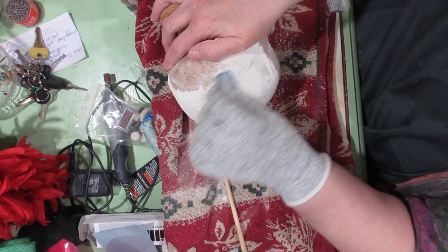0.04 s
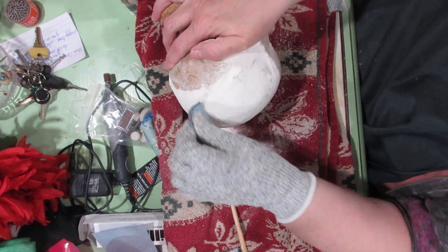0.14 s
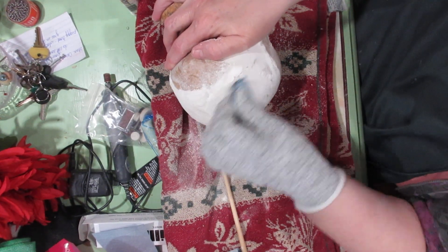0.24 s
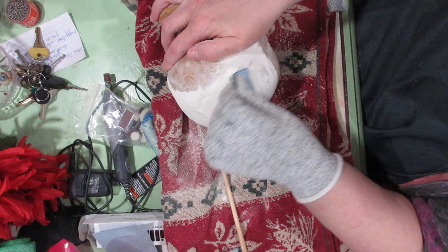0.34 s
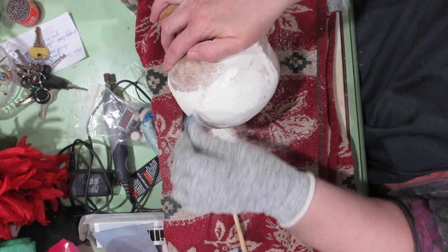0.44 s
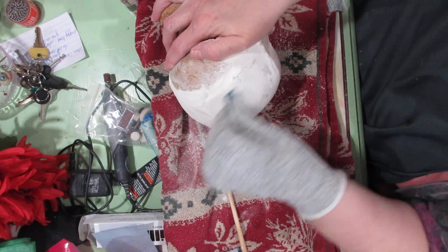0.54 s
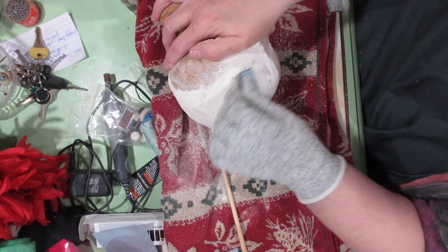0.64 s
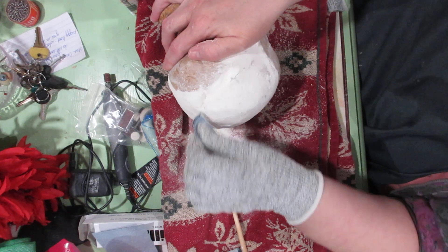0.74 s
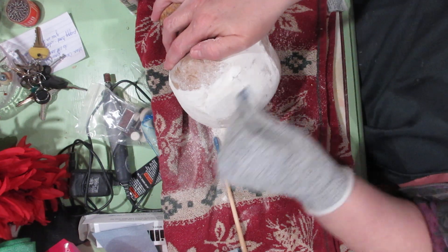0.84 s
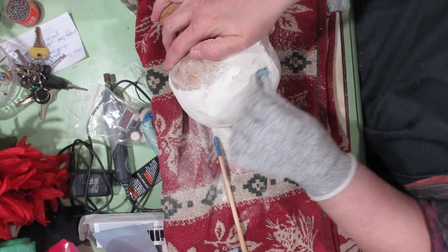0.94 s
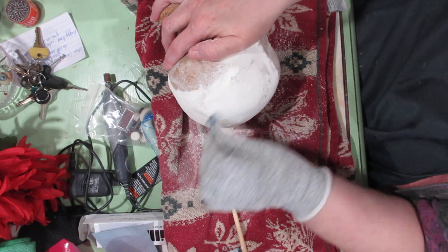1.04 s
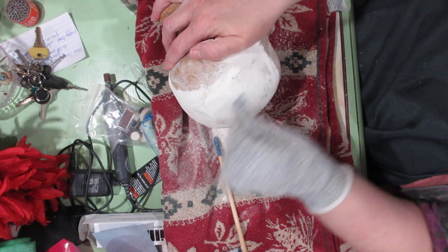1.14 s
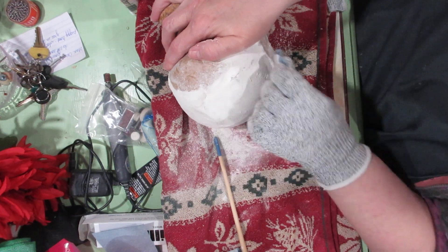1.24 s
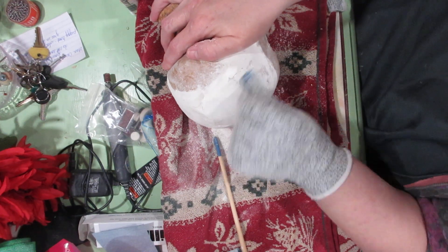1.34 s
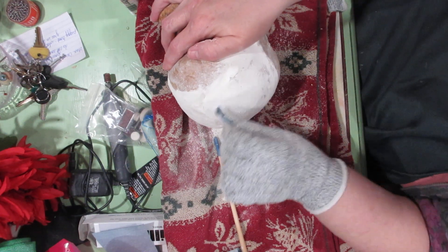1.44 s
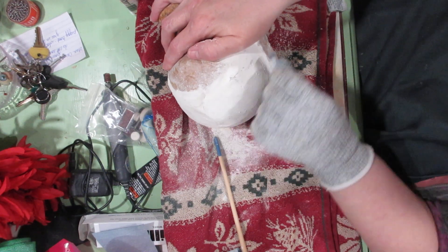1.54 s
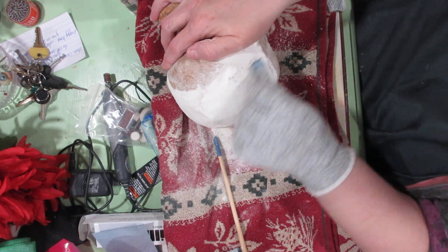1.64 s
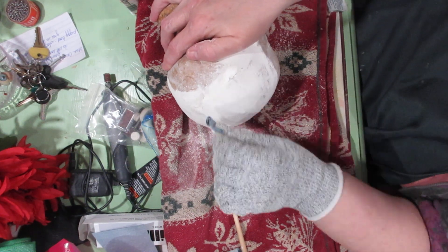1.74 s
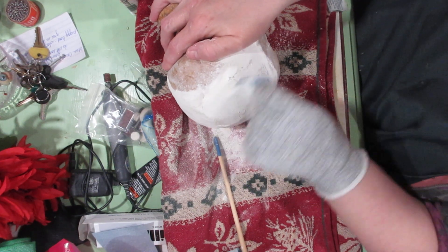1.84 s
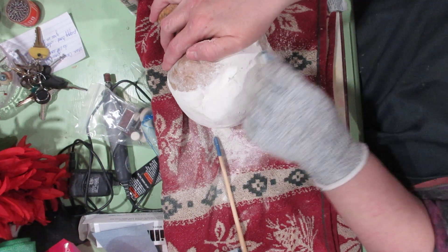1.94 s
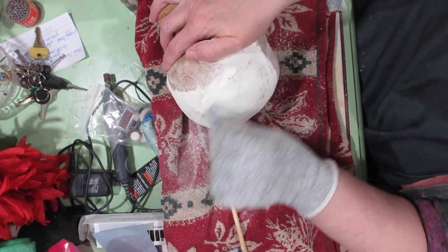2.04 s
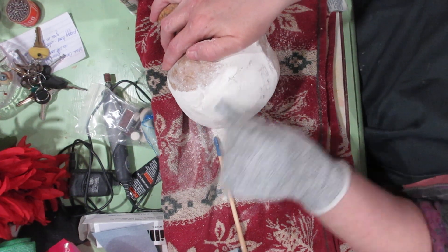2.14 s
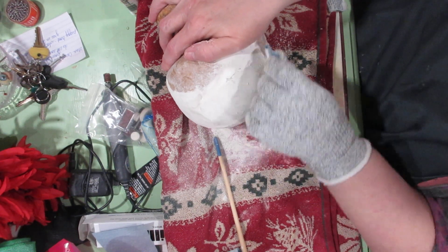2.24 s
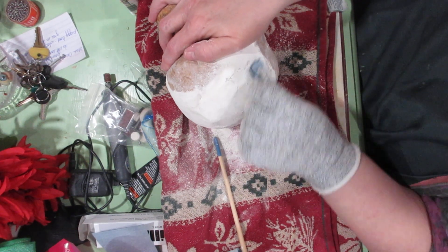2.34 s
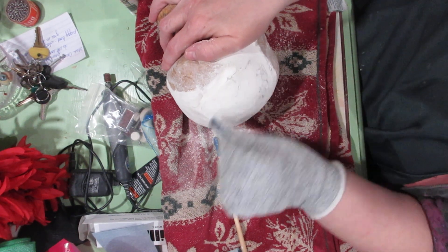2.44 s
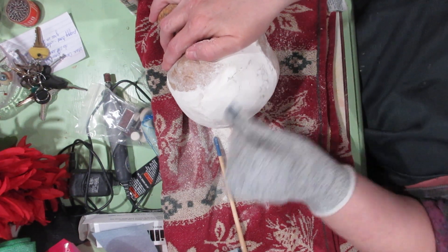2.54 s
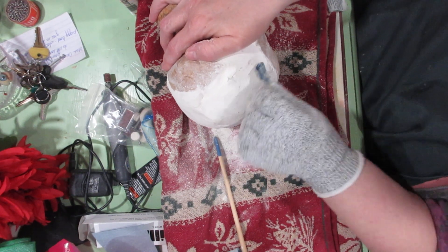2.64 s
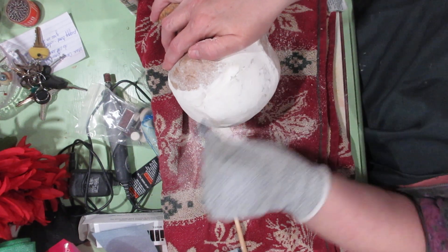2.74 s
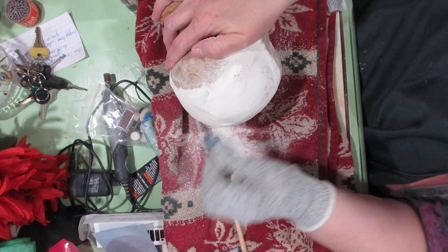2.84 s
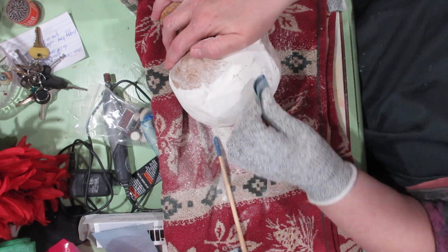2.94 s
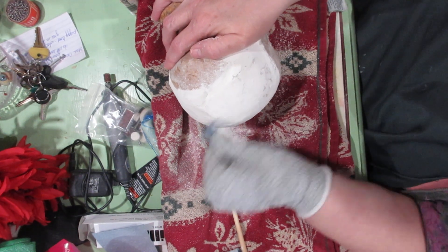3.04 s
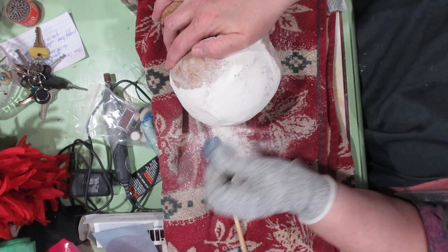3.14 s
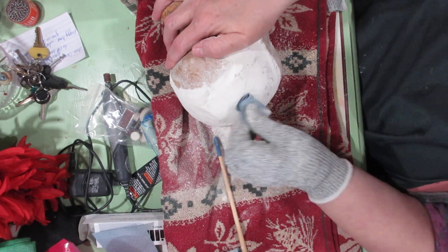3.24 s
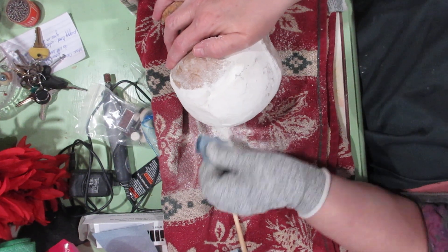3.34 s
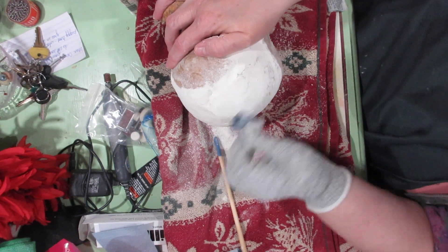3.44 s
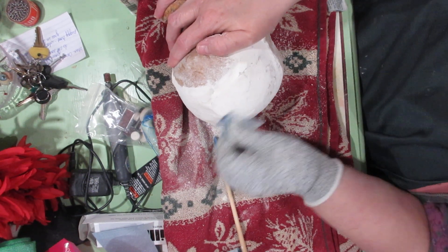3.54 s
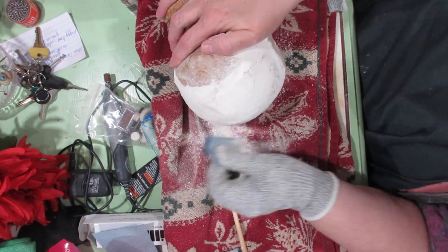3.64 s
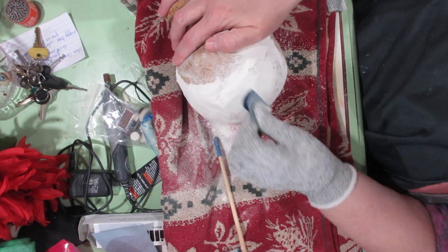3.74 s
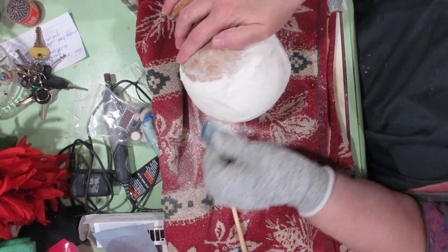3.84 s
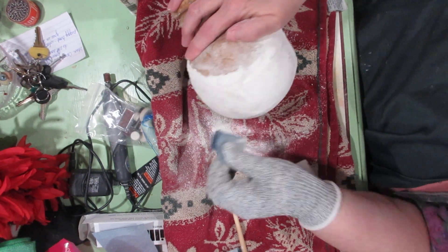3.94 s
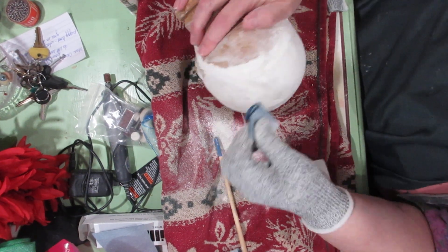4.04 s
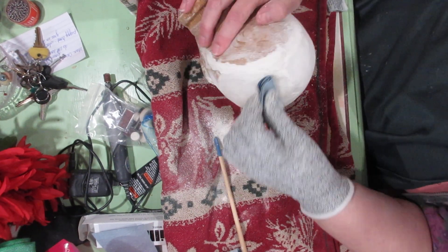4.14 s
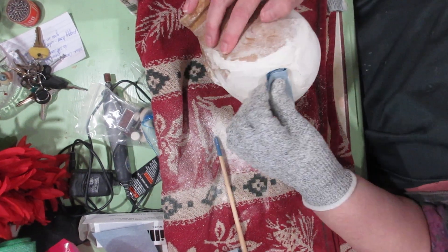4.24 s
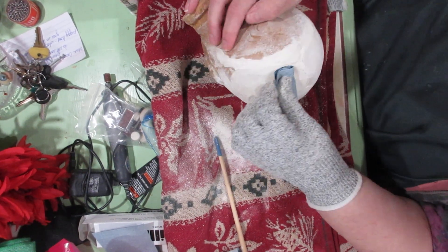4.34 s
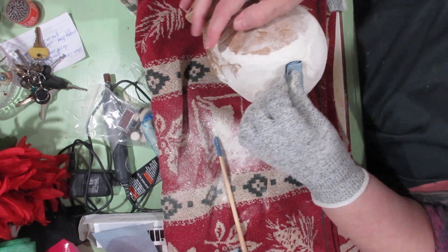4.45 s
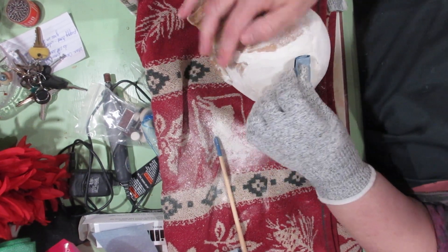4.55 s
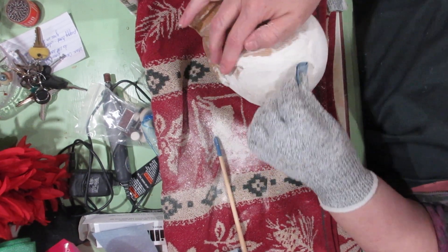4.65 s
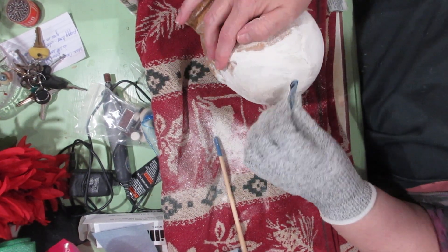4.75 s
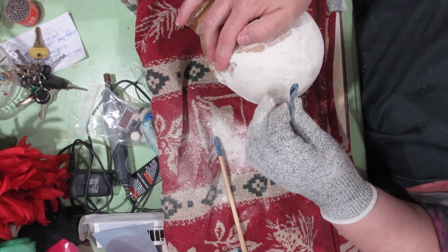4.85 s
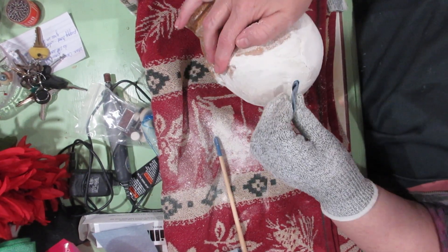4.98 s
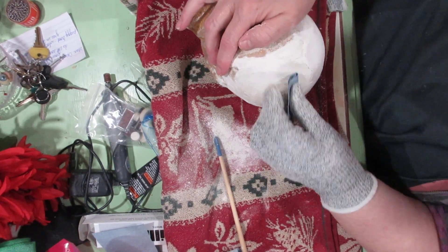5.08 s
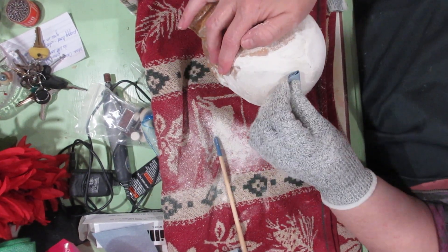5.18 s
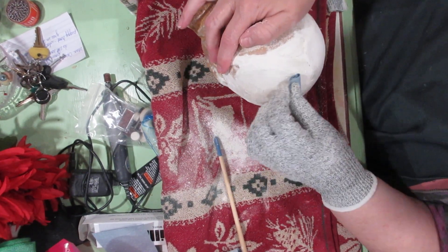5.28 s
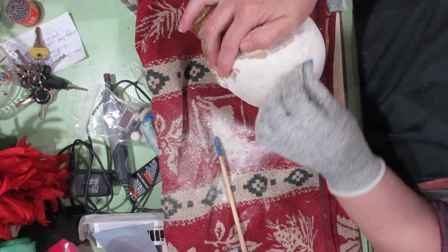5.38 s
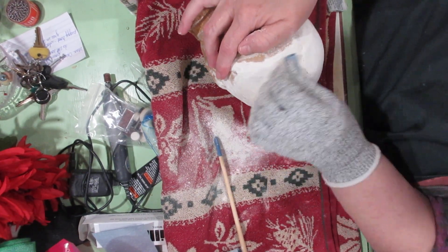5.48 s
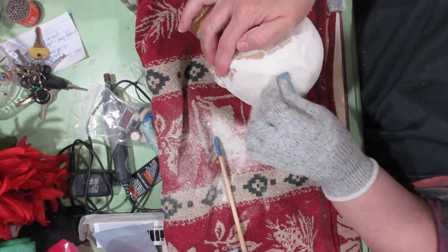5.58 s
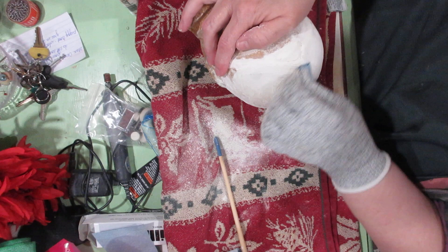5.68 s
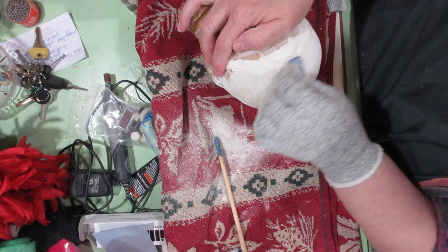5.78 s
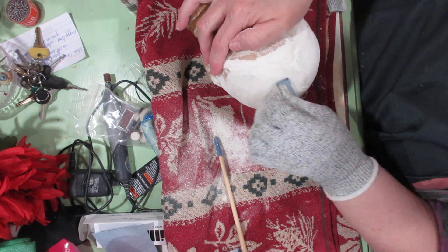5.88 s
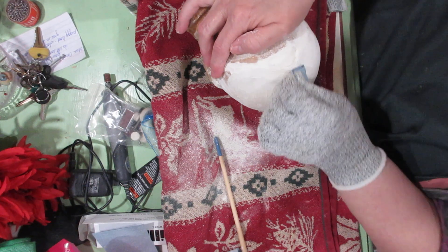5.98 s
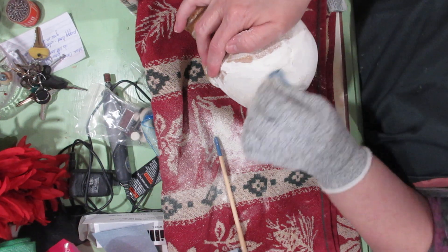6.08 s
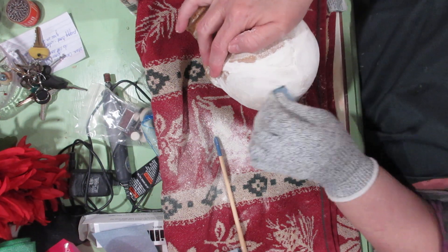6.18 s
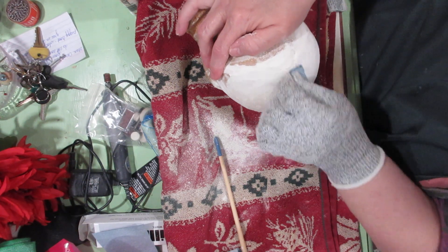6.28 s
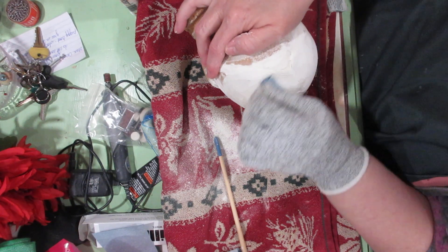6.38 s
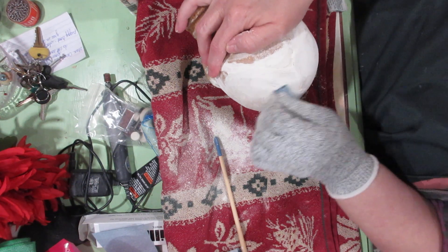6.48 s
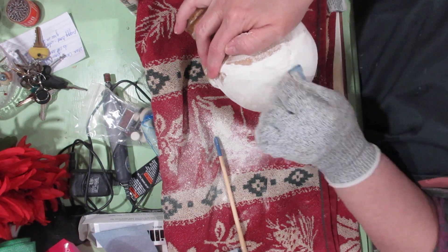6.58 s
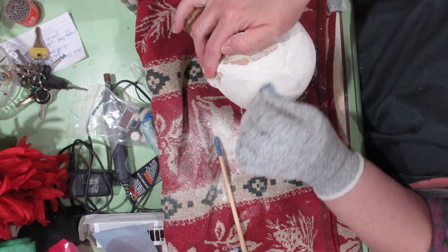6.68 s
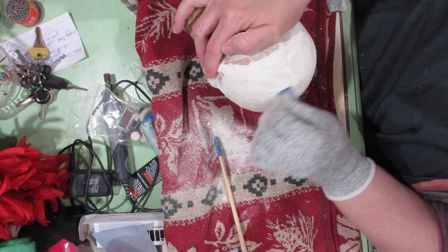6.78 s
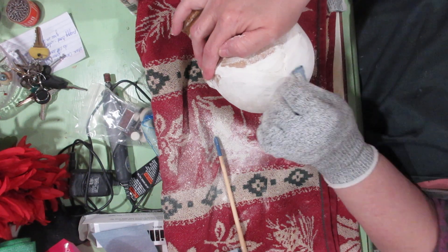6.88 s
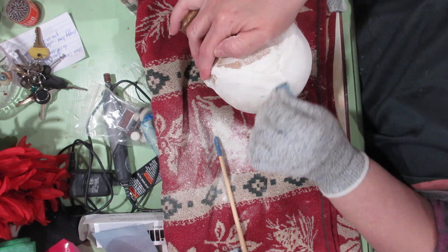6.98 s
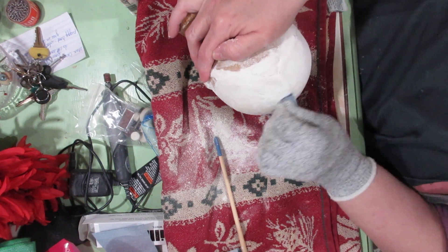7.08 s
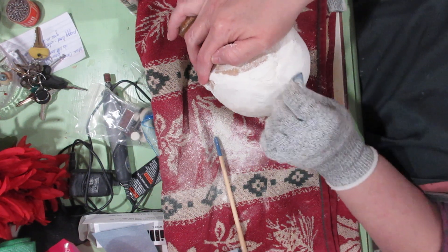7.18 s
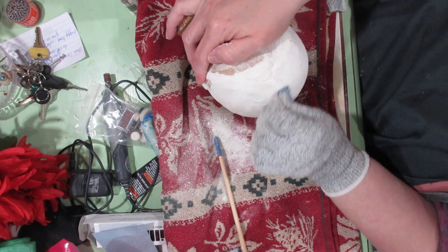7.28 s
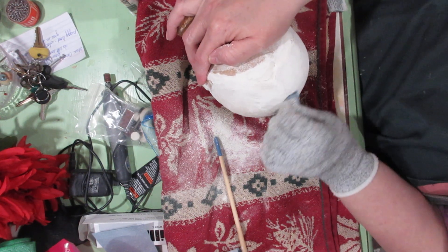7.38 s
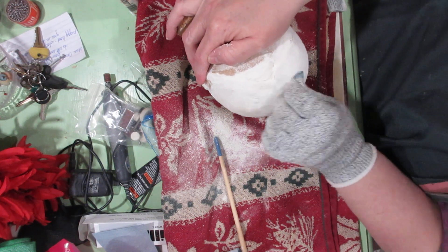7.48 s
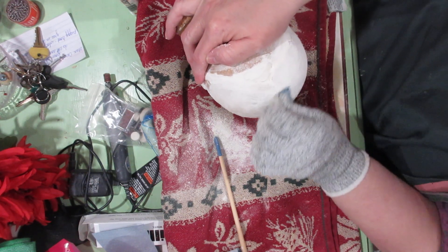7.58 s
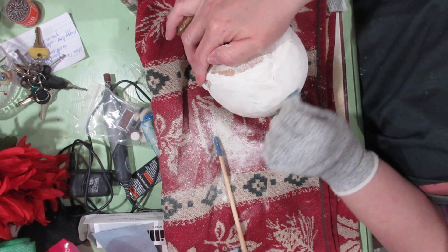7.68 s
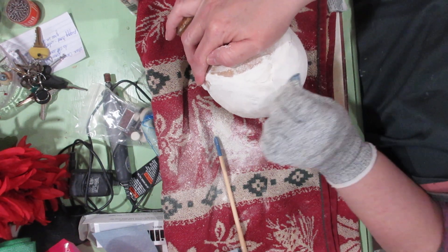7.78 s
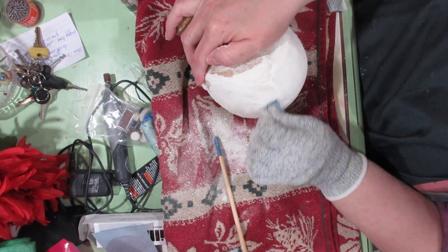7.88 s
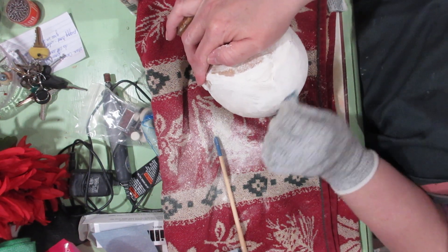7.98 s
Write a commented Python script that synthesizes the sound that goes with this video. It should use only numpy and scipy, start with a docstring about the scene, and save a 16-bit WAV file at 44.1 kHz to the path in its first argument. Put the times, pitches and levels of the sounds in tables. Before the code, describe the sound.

Sandpaper scrapes a hollow plaster-coated ball in short separate gritty swipes, pauses with a soft thump, then rubs in fast steady back-and-forth strokes.

```python
"""A gloved hand rubs a scrap of sandpaper over a hollow plaster-coated ball held on a cloth-covered bench.
Swipes come first, some in two joined movements, then an unbroken back-and-forth. Random grit clicks,
filtered in several ways, make the scrape, dust hiss, paper rasp, shell ring and dull push. Short sprays of
grit with struck-shell tones mark the paper touching down or catching. Glove and cloth rustle, and the ball
lands once with a soft thump. Behind are a small room's reflections, its air noise and a low wavering hum."""
import sys
import numpy as np
from scipy import signal
from scipy.fft import rfft, irfft
from scipy.io import wavfile
from scipy.ndimage import uniform_filter1d

SR = 44100
rng = np.random.default_rng(int(sys.argv[2]) if len(sys.argv) > 2 else 0)


def inscribe(sig):
    """Save sig as 16-bit PCM at rate SR to the path in sys.argv[1].

    A 1-D sig is mono; a 2-D sig holds one channel per row.
    Samples are clipped to [-1, 1] before scaling.
    """
    pcm = np.round(np.clip(np.atleast_2d(sig).T, -1, 1) * 32767)
    wavfile.write(sys.argv[1], SR, pcm.astype(np.int16))


N = 353682
TIME = np.arange(N) / SR  # seconds

# spectrum of grit scraping the ball: f/Hz, level per Hz/dB
SCRAPE = [(1290, -67), (2200, -4), (2950, 1.5), (3620, 0.5), (4550, -1.5), (4980, -3), (5320, -2.5),
          (11400, -8), (14400, -14), (15500, -20.5)]
# resonances of the rubbed shell: f/Hz, basic width/Hz (each use widens or narrows it), level/dB
SHELL = [(1781, 160, -3), (1668, 275, -0.5), (2005, 860, 9.5)]
# strokes of the unbroken rubbing: hand turns at t/s, scrape there/dB, time to full speed/s, scrape there/dB,
# then levels above the scrape at full speed: dust hiss/dB, shell ring/dB, paper rasp/dB
RUBS = [(5.21, -56, 0.18, -46, -5, -6.5, 2), (5.385, -42, 0.027, -31, -5, -9, -4),
        (5.508, -36, 0.099, -29.5, -8, -8.5, -1), (5.686, -35.5, 0.06, -33, -6, -4, -2),
        (5.82, -40, 0.075, -30, -6, -7, -3), (5.975, -42.5, 0.053, -32, -8, -2, -3),
        (6.088, -38, 0.071, -32, -4.5, -9, -5), (6.257, -39.5, .078, -31.5, -6.5, -4, -8),
        (6.378, -37.5, 0.081, -29.5, -2, -7, -12), (6.52, -37.5, 0.081, -32.5, -5.5, -7.5, -7),
        (6.662, -40, 0.059, -29.5, -4, -7, -11), (6.803, -40, .066, -33.5, -2, -10, -13),
        (6.992, -44.5, 0.081, -33.5, -3.5, -6, -26), (7.14, -42, 0.068, -34, -1.5, -9.5, -22),
        (7.291, -42, 0.044, -35.5, -2.5, -7, -16), (7.427, -40, 0.049, -34.5, -1.5, -8, -28),
        (7.58, -38, 0.078, -35, -3, -7.5, -10), (7.712, -40, 0.05, -34.5, 0, -9, -27),
        (7.818, -36.5, 0.12, -34, -1.5, -9, -4.5), (7.965, -36.5, 0.044, -37.5, -6, -4, -18)]


def sanding():
    """The same grit clicks feed the scrape, paper rasp, dust hiss, shell ring and dull push."""
    # spectrum of the dull push into the ball: f/Hz, level per Hz/dB
    push_spectrum = [(150, -26), (300, -7), (600, 1), (900, 4), (1300, 1), (2200, -44)]
    coarse_db = -9.5  # sparse large grains among the fine grit
    paper_drift_hz = 89  # rms; the pinch on the paper keeps changing
    swipe_rasp_width_hz, rub_rasp_width_hz = 130, 330  # held flat, the paper rasps more broadly
    rub_sing_db = -14.5  # steady rubbing keeps one narrow shell tone singing

    level_db, hiss_db, ring_db, push_db, paper_hz, rasp_db = hand_controls()
    hiss_db, ring_db, push_db, rasp_db = uniform_filter1d(
        [hiss_db, ring_db, push_db, rasp_db], size=200, axis=1)
    rubbing_start = RUBS[0][0]

    fine = grit(per_s=18000, spread_db=2.0, clump_db=1.0)
    coarse = grit(per_s=500, spread_db=2.5, clump_db=2.5)
    clicks = patchy(fine + gain_of(coarse_db) * coarse, db=1.99)

    # the pinched scrap of paper rasps on a low mode and a weaker overtone
    paper_hz = uniform_filter1d(paper_hz, 400) + paper_drift_hz * flicker(0.021)
    swipe_rasp = evened(resonate(clicks, paper_hz, swipe_rasp_width_hz))
    rub_rasp = evened(resonate(clicks, paper_hz, rub_rasp_width_hz))
    overtone = evened(resonate(clicks, 1.76 * paper_hz, 240))
    rasp = np.where(TIME < rubbing_start, swipe_rasp, rub_rasp) + 0.16 * overtone

    scrape = coloured(clicks, SCRAPE, hi_hz=7150) + gain_of(rasp_db) * rasp
    scrape = scrape / np.sqrt(1 + gain_of(2 * rasp_db))  # more rasp leaves less scrape
    hiss = coloured(clicks, SCRAPE, lo_hz=7900)

    ring = 0
    for hz, width, db in SHELL:
        once = resonate(clicks, hz, 1.56 * width)
        ring = ring + gain_of(db) * evened(resonate(once, hz, 1.56 * width))
    singing = evened(resonate(clicks, SHELL[0][0], 52))
    ring = evened(ring) + gain_of(rub_sing_db) * (TIME > rubbing_start) * singing

    hollow_tone = evened(resonate(clicks, 844, 48))
    push = evened(coloured(clicks, push_spectrum) + 0.065 * hollow_tone)

    layers = scrape + gain_of(hiss_db) * hiss + gain_of(ring_db) * ring + gain_of(push_db) * push
    return uniform_filter1d(gain_of(level_db), size=130) * layers


def hand_controls():
    """Scrape level, and the colour that follows from speed and digging in."""
    # the paper flattens and digs in towards the end of each swiping movement
    dig_hiss_db, dig_rasp_db, dig_push_share = 1, -13, 1.34
    # change for each dB of scrape: slower movement has less hiss and rasp, and more push
    swipe_hiss_per_db, rub_hiss_per_db = 0.2, 0.74
    swipe_ring_per_db, rub_ring_per_db = 0.11, -0.26  # slow swipes ring less, slow rubbing more
    push_per_db, rasp_per_db = -0.2, 0.1

    # rows at rest: scrape/dB, hiss/dB, ring/dB, push/dB, paper resonance/Hz, rasp/dB; 1 s of spare room
    controls = np.zeros((6, N + SR)) + [[-120], [0], [0], [0], [3400], [-9]]
    movements = [(swipe_controls(), swipe_hiss_per_db, swipe_ring_per_db),
                 (rub_controls(), rub_hiss_per_db, rub_ring_per_db)]
    for strokes, hiss_per_db, ring_per_db in movements:
        for start, level_db, top_db, dig, (hiss, ring, push, rasp, paper_hz, dig_db) in strokes:
            under = level_db - top_db  # dB relative to full speed
            controls[:, round(start * SR):][:, :len(dig)] = [
                level_db,
                hiss + hiss_per_db * under + dig_hiss_db * dig,
                ring + ring_per_db * under + dig_db * dig,
                push + push_per_db * under + dig_push_share * dig_db * dig,
                paper_hz + 0 * dig,
                rasp + rasp_per_db * under + dig_rasp_db * dig]
    return controls[:, :N]


def swipe_controls():
    """Each movement of a swipe rises to full speed, then digs in as its speed changes to the end."""
    # movements, one or two joined to a swipe: start t/s, rise/s, fall/s, scrape at start/dB,
    # at full speed/dB, at the end/dB, then levels above the scrape at full speed: dust hiss/dB,
    # shell ring/dB, push/dB, paper rasp/dB; paper resonance f/Hz (it drifts around this),
    # ring gained by digging in/dB (the push gains in proportion)
    movements = [(.092, 0.049, 0.076, -38, -29, -40.5, -6.5, -15, -19.5, -8, 3450, 6.5),
                 (.41, 0.067, 0.04, -49.5, -27, -35.5, -3, -10.5, -24, -11, 3570, 13),
                 (.715, .052, 0.053, -55, -29.5, -38.5, -1.5, -10.5, -21, -9, 3520, 4),
                 (1.036, 0.065, .036, -41.5, -30.5, -42.5, -1.5, -12.5, -26, -3, 3650, 3),
                 (1.375, 0.071, 0.032, -47, -29.5, -37.5, -4, -13, -23.5, 1.5, 3330, -2),
                 (1.686, 0.031, 0.015, -45, -34.5, -38.5, -9.5, -14, -17, -5, 3700, -4),
                 (1.734, 0.034, 0.024, -38.5, -30, -36, 0, -11.5, -20, -5, 3170, 2),
                 (1.897, .03, 0.018, -42, -26, -26, -11, -24, -15.5, -3, 3120, 3.5),
                 (2.014, 0.024, 0.021, -50, -31.5, -34, -10.5, -21, -24, 2, 3330, 1),
                 (2.062, 0.041, 0.027, -38, -27.5, -32, -1.5, -16, -25, 6, 3190, 3),
                 (2.365, 0.02, .045, -42, -37, -34, -11, -10, -14.5, 3, 3680, -8),
                 (2.428, 0.047, 0.033, -38, -31, -37, 1.5, -13, -25.5, -10, 3350, 6.5),
                 (2.726, 0.064, .037, -41, -27.5, -37.5, -1.5, -11.5, -22, -1, 3320, 4.5),
                 (3.047, 0.065, 0.017, -44.5, -28.5, -31, 2.5, -7, -20, -14, 3400, 14.5),
                 (3.31, 0.0091, .03, -47, -41.5, -49, 0.5, -17, -11, 2, 3100, 1),
                 (3.34, .042, 0.026, -41.5, -24.5, -27, 2, -10.5, -19, -34, 3420, 6.5),
                 (3.578, 0.061, 0.026, -42, -24, -34, 2.5, -9.5, -17.5, -13, 3180, 7),
                 (3.846, .035, 0.0417, -45, -27.5, -25.5, -2.5, -20, -19, -19, 3970, 9.5),
                 (4.104, 0.0089, 0.057, -39, -45, -54, -10, -4, 8.5, -19, 3400, -10),
                 (4.225, 0.006, 0.021, -38, -30.5, -46.5, -6, -7, -18.5, 3, 3100, 1),
                 (4.255, 0.021, 0.019, -38.5, -32.5, -46, -8, -15, -17, -14, 3120, -5),
                 (4.53, 0.054, 0.071, -56, -49, -57, -9, -1, -27, -16, 3430, 6),
                 (4.69, 0.041, 0.019, -55, -36.5, -36.5, -8.5, -6.5, -21, 4, 3400, 0), ]
    rise_shape, fall_shape = 1.7, 1.2  # powers: speed gathers along an arch and falls late
    for start, rise, fall, start_db, top_db, end_db, *colour in movements:
        t = np.arange(0, rise + fall, 1 / SR)
        up = np.minimum(t / rise, 1)
        dig = np.clip((t - rise) / fall, 0, 1)
        level_db = start_db + (top_db - start_db) * np.sin(np.pi / 2 * up) ** rise_shape
        level_db = level_db + (end_db - top_db) * dig ** fall_shape
        yield start, level_db, top_db, dig, colour


def rub_controls():
    """Each stroke swings up from one turn of the hand to full speed and down to the next turn."""
    # how hard the hand leans on the ball: t/s, push above the scrape at full speed/dB
    lean = [(5.2, -10), (5.4, -13.5), (5.6, -23.5), (6.05, -17.5), (6.5, -19.5), (7.1, -18.5), (7.5, -16),
            (8.0, -21.5)]
    rise_shape, fall_shape = 1.7, 1.66  # powers: easing out of one turn and into the next
    paper_hz = 3620  # basic paper resonance, the same for every stroke
    next_turns = RUBS[1:] + [(N / SR, RUBS[-1][3])]  # the last stroke holds its speed to the end
    for (start, turn_db, rise, top_db, hiss, ring, rasp), (end, end_db, *_) in zip(RUBS, next_turns):
        t = np.arange(0, end - start, 1 / SR)
        up = np.minimum(t / rise, 1)
        down = np.clip((t - rise) / max(end - start - rise, 1e-3), 0, 1)
        level_db = turn_db + (top_db - turn_db) * np.sin(np.pi / 2 * up) ** rise_shape
        level_db = level_db + (end_db - top_db) * np.sin(np.pi / 2 * down) ** fall_shape
        push = np.interp(start + t, *np.transpose(lean))
        # the paper stays on the ball, so there is no digging in
        yield start, level_db, top_db, 0 * t, (hiss, ring, push, rasp, paper_hz, 0)


def grit(per_s, spread_db, clump_db):
    """Grains break loose as clicks of uneven size, in clumps where the paper bites."""
    size = gain_of(spread_db * np.minimum(rng.exponential(1, N), 5))
    signed = size * rng.choice([-1., 1.], N)
    clumps = gain_of(clump_db * flicker(0.0031) + 0.76 * flicker(0.018))
    return evened(signed * (rng.random(N) < per_s / SR) * clumps)


def patchy(x, db):
    """The colour drifts in patches as other parts of the paper come to bear."""
    z = signal.stft(x, nperseg=256, noverlap=192)[2]
    field = rng.standard_normal(z.shape[::-1]).T
    field = uniform_filter1d(field, size=5, axis=0)  # smooth across pitch
    field = evened(uniform_filter1d(field, size=30, axis=1))  # and across time
    return evened(signal.istft(z * gain_of(db * field), nperseg=256, noverlap=192)[1][:N])


def touches():
    """Each touch is a short spray of grit plus a blow that rings the shell."""
    # the paper touches down or catches: t/s, basic level/dB, low knock relative to it/dB (lowered below),
    # spray length/s, high tick relative to it/dB (raised below, most for firm knocks and hardly for
    # glancing touches)
    touch_list = [(0.014, -26, -35, 0.0034, -16), (0.021, -17, -28, 0.0024, -25),
                  (0.033, -8.5, -50, 0.0027, -20), (0.0427, -11, -44, 0.005, -19),
                  (0.051, -11, -48, 0.0068, -14), (0.0596, -18, -32, 0.0088, -16),
                  (0.072, -7.5, -50, 0.0026, -22), (0.2798, -17.5, -32, 0.0047, -26),
                  (0.3137, -30, -22, 0.0046, -18), (0.3492, -22.5, -12.5, 0.0048, -14),
                  (0.3554, -23, -32, 0.007, -15), (0.364, -12, -31, 0.0043, -21),
                  (0.3724, -22, -27, 0.0037, -15), (0.3804, -25, -32, 0.004, -22),
                  (0.412, -25, -19, 0.0035, -18), (0.5104, -17, -56, 0.0042, -15),
                  (0.585, -23.5, -38, 0.0025, -33), (0.6833, -15.5, -16, 0.0021, -15.5),
                  (0.6874, -17.5, -28, 0.0041, -13), (0.6994, -14.5, -26, 0.0045, -21),
                  (1.006, -19.5, -10, 0.0084, -7.5), (1.022, -10.5, -27, 0.0047, -14),
                  (1.0266, -14, -41, 0.0062, -14), (1.281, -14, -33, 0.0019, -35),
                  (1.346, -9.5, -14, 0.0028, -17), (1.36, -6.5, -37, 0.0065, -30),
                  (1.368, -23, -19, 0.0033, -11), (1.68, -18, -9, 0.0023, -9.5),
                  (1.9033, -11, -15, 0.0054, -20), (2.02, -17.5, -19, 0.0031, -19),
                  (2.3497, -17.5, -15.5, 0.007, -12), (2.586, -28.5, -34, 0.0031, -23),
                  (2.6508, -12, -33.5, 0.0023, -38), (2.671, -19, -19, 0.006, -23),
                  (2.7183, -19, -13, 0.0049, -10), (2.918, -25, -34, 0.0021, -30),
                  (2.964, -22.5, -17, 0.0052, -22), (2.986, -29, -25, 0.0027, -25),
                  (3.041, -13.5, -24.5, 0.006, -4), (3.257, -30, -19, 0.0036, -21),
                  (3.31, -18, -23, 0.0043, -13.5), (3.321, -26, -23, 0.0033, -21),
                  (3.5725, -27, -4.5, 0.0043, -14), (3.836, -9.5, -16, 0.0042, -36),
                  (3.992, -30, -32, 0.0034, -22), (4.011, -14, -36, 0.0045, -15),
                  (4.1025, -15.5, -12, 0.0051, -17), (4.159, -23.5, -19, 0.0041, -18),
                  (4.223, -19, -31, 0.0022, -19), (4.333, -26, -36, 0.0026, -18),
                  (4.517, -24, -35, 0.0049, -22), (4.526, -21, -38, 0.0024, -25),
                  (4.5344, -20, -30, 0.0021, -27), (4.665, -23, -28, 0.0034, -12),
                  (4.6745, -19, -39, 0.0027, -11.5), (5.0428, -16.5, -22.5, 0.0034, -32),
                  (5.071, -21.5, -26, 0.007, -22), (5.094, -30, -23, 0.0044, -20),
                  (5.111, -20.5, -43, 0.0045, -16), (5.125, -24, -38, 0.0017, -13),
                  (5.173, -29.5, -21, 0.019, -10), (5.198, -20.5, -30, 0.0038, -15),
                  (5.4275, -3, -28, 0.002, -31)]
    # tones of the struck shell: f/Hz (detuned for each blow), level/dB, time to fall 60 dB/s
    shell_modes = [(304, -21, 0.13), (495, -5, 0.023), (613, -6.5, 0.06), (681, 8, 0.019),
                   (937, 5.5, 0.016), (1450, -9, 0.0048), (1810, -8, 0.0082), (2430, -5, 0.01),
                   (3346, -9, 0.022), (3680, -13, .01), (5660, -7, 0.0041)]
    t = np.arange(4000) / SR
    spray = coloured(grit(per_s=20000, spread_db=1.2, clump_db=.8), SCRAPE, lo_hz=1500)
    spray = evened(spray + 0.41 * evened(resonate(spray, 3420, 230)))
    shape, blows = np.zeros(N + len(t)), np.zeros(N + len(t))
    high = np.transpose(shell_modes)[0] > 1000
    chances = rng.standard_normal((len(touch_list), len(shell_modes)))
    for (s, level_db, knock_db, length, tick_db), chance in zip(touch_list, chances):
        at, length = round(s * SR), max(length, 5e-4)
        # a touch that hardly knocks swells in slowly, sprays more and has its tick raised less
        glancing = np.clip((-knock_db - 16.5) / 12, .05, 1)
        rise = 1 - np.exp(-(t / (0.41 * glancing * length)) ** 2)
        spray_gain = gain_of(level_db - 16.5 + 3.4 * glancing)
        shape[at:at + len(t)] += spray_gain * rise * np.exp(-(t / length) ** 2.4)
        lift_db = np.where(high, tick_db + 8 * (1 - glancing), knock_db - 12.0)
        blows[at:at + len(t)] += gain_of(level_db) * struck(shell_modes, lift_db, chance, t)
    return shape[:N] * spray + blows[:N]


def struck(modes, lift_db, chance, t):
    """Dying modes, detuned a little by where the blow lands; the padded contact rounds the start."""
    detune = 1 + .03 * chance
    rings = 0
    for (hz, db, t60), lift, factor in zip(modes, lift_db, detune):
        rings = rings + gain_of(db + lift - 60 * t / t60) * np.sin(2 * np.pi * hz * factor * t)
    return rings * (1 - np.exp(-t / 0.000094))


def handling():
    """A faint rustle of glove and cloth, and fingers sliding on the ringing shell."""
    # fingers and cloth shifting: t/s, rustle level/dB, slide level/dB
    shifts = [(0, -48, -55), (.2, -47, -53), (.36, -68, -57), (.52, -55, -51), (.65, -72, -81),
              (.8, -66, -65), (1.34, -64, -65), (2.1, -76, -83), (2.41, -53, -75), (2.7, -72, -80),
              (2.87, -57, -58.5), (3.2, -58.5, -54.5), (3.6, -67, -68), (3.82, -58, -57), (4.2, -55.5, -62),
              (4.45, -60.5, -58), (4.62, -62, -68), (4.78, -65, -80), (5.02, -59.5, -82),
              (5.08, -53.5, -78), (5.4, -58, -68)]
    s, rustle_db, slide_db = np.transpose(shifts)
    clicks = grit(per_s=12000, spread_db=4.0, clump_db=5.0)
    rustle = gain_of(np.interp(TIME, s, rustle_db)) * coloured(clicks, SCRAPE, lo_hz=2300)
    hz, width, _ = SHELL[0]
    ring = resonate(rng.standard_normal(N), hz, 3 * width)
    ring = resonate(ring, hz, 3 * width)
    slide = gain_of(np.interp(TIME, s, slide_db)) * evened(ring)
    return (rustle + slide) * (TIME < s[-1])


def thump():
    """The turned ball lands, and its weight rings the bench dully through the cloth."""
    # the landing: t/s, basic level/dB
    landing = (4.103, -30.5)
    # tones of the struck bench: f/Hz (detuned by chance), level/dB, time to fall 60 dB/s
    bench_modes = [(165, -7, 0.23), (297, 7.5, 0.05), (418, -5, 0.12), (702, 0, 0.082), (886, -5, 0.051)]
    start, level_db = landing
    t = np.maximum(TIME - start, 0)
    chance = rng.standard_normal(len(bench_modes))
    rings = struck(bench_modes, np.zeros(len(bench_modes)), chance, t)
    return gain_of(level_db) * (1 - np.exp(-t / 0.0025)) * rings


def room(x):
    """Sparse reflections of random sign, one in every 20 samples, each band dying at its own speed."""
    # how long the room's echo lasts: f/Hz, time to fall 60 dB/s
    echo_times = [(300, 0.29), (2000, 0.21), (6000, 0.19), (14000, 0.12)]
    taps = np.zeros(SR // 2)
    at = np.arange(100, len(taps) - 20, 20)
    taps[at + rng.integers(0, 20, len(at))] = rng.choice([-1., 1.], len(at))
    hz, t, z = signal.stft(taps, SR, nperseg=256)
    fade = gain_of(-60 * t / read(echo_times, hz)[:, None])
    tail = signal.istft(z * fade, SR, nperseg=256)[1]
    return signal.fftconvolve(x, tail / np.linalg.norm(tail))[:N]


def air():
    """Room air as gently varying filtered noise, and a low hum as a wavering sine."""
    # spectrum of the air noise: f/Hz, level per Hz/dB
    air_spectrum = [(24, -32), (40, -13), (98, -9.5), (224, -11), (317, -11.5), (548, -13), (591, -14),
                    (797, -15), (1080, -13.5), (1450, -14.5), (2060, -21.5), (10900, -30), (15500, -42)]
    air_db, hum_hz, hum_db = -54, 32.2, -62  # average air level, hum pitch and early hum level
    sag_start_s, sag_db = 6.68, -6.5  # the hum then sinks over 0.1 s
    waver_db, extra_late_waver_db = 2.5, 1.5  # and wavers more

    noise = coloured(rng.standard_normal(N), air_spectrum, lo_hz=52)
    noise = gain_of(air_db + 0.76 * flicker(0.084)) * noise
    turns = np.cumsum(hum_hz + 0.93 * flicker(0.16)) / SR
    late = np.clip((TIME - sag_start_s) / .1, 0, 1)
    waver = (waver_db + extra_late_waver_db * late) * flicker(.08)
    level_db = hum_db + sag_db * late + waver
    return noise + np.sqrt(2) * gain_of(level_db) * np.sin(2 * np.pi * turns)


def gain_of(db):
    """Decibels to a factor."""
    return 10 ** (np.asarray(db) / 20)


def evened(x):
    """Scales to rms 1."""
    return x / np.sqrt(np.mean(x ** 2) + 1e-20)


def read(points, hz):
    """Reads a table of values between its points on a log-frequency axis."""
    f, value = np.transpose(points)
    return np.interp(np.log(hz + 1), np.log(f + 1), value)


def coloured(x, points, lo_hz=0, hi_hz=SR):
    """Filters x by the spectrum points between two soft edges, at rms 1."""
    hz = np.fft.rfftfreq(len(x), 1 / SR) + 1e-3
    edges = 1 / np.sqrt((1 + (lo_hz / hz) ** 10) * (1 + (hz / hi_hz) ** 10))
    return evened(irfft(rfft(x) * gain_of(read(points, hz)) * edges, len(x)))


def resonate(x, hz, width):
    """Shifts the curve hz down to zero, smooths, and shifts back: a resonance of gain 1."""
    turn = np.exp(2j * np.pi * np.cumsum(hz * np.ones(len(x))) / SR)
    r = np.exp(-np.pi * width / SR)
    return 2 * (turn * signal.lfilter([1 - r], [1, -r], x / turn)).real


def flicker(s):
    """Smooth chance from noise averaged twice over s seconds, at rms 1."""
    span = max(round(s * SR), 2)
    return evened(uniform_filter1d(uniform_filter1d(rng.standard_normal(N), span), span))


def scene():
    """Sanding and touches without deep bass, the thump, their reflections, handling and room air."""
    no_bass = signal.butter(2, 140, "high", fs=SR, output="sos")
    hand = signal.sosfilt(no_bass, sanding() + touches()) + thump()
    room_db = -14.5
    return (hand + gain_of(room_db) * room(hand) + handling() + air())[None]


def record(dry):
    """A steep low-pass filter limits the treble."""
    low_pass = signal.firwin(1501, 14990, window=("kaiser", 8), fs=SR)  # edge in Hz
    return signal.oaconvolve(dry, low_pass[None], "same")


dry = scene()
out = record(dry)
inscribe(out)
```